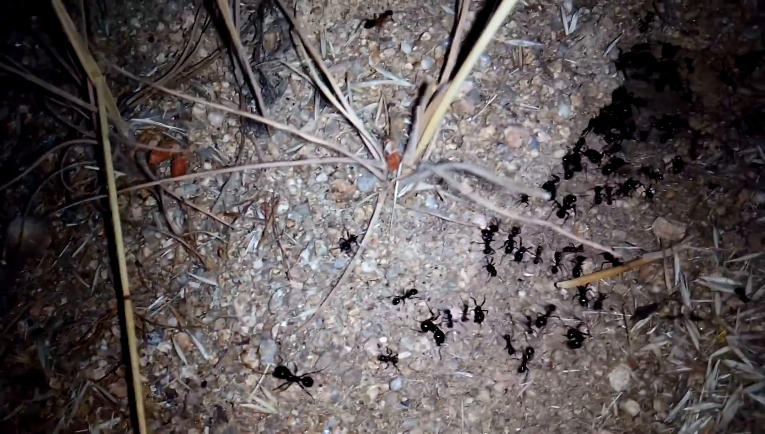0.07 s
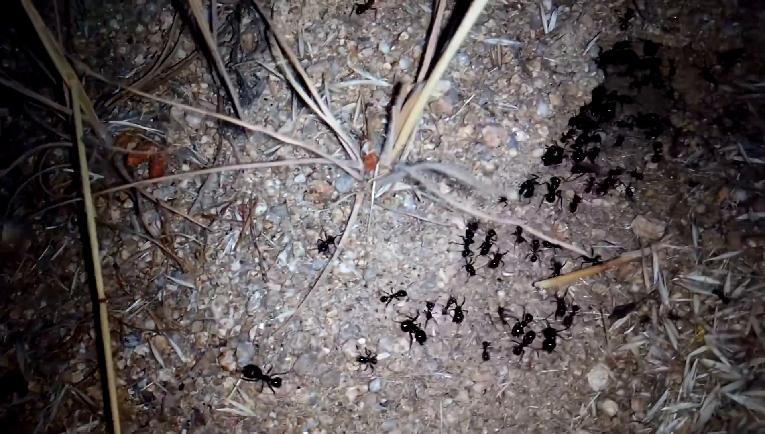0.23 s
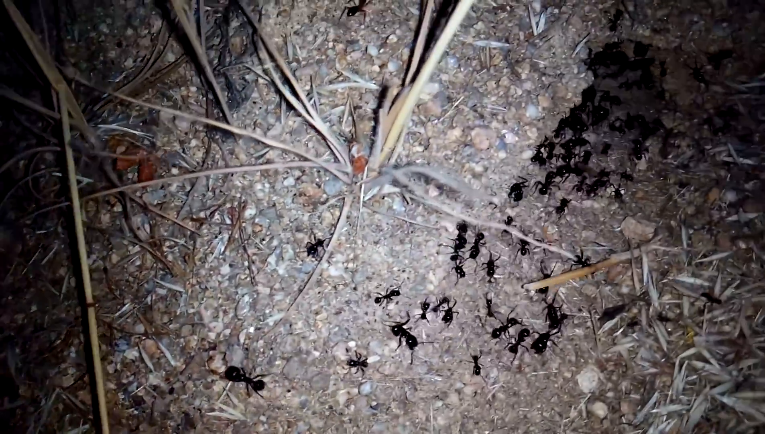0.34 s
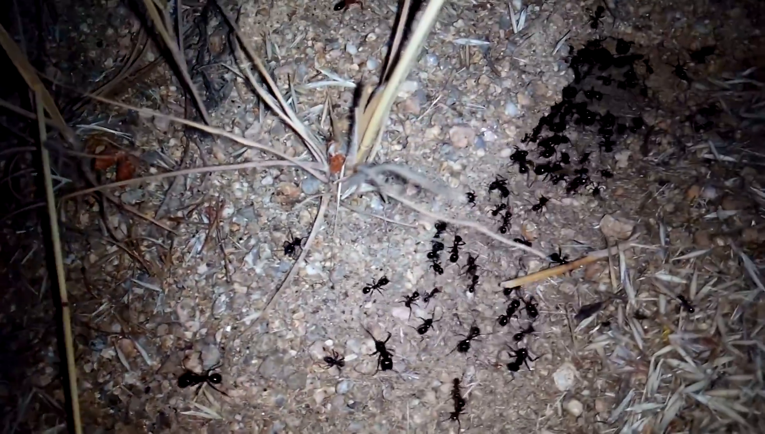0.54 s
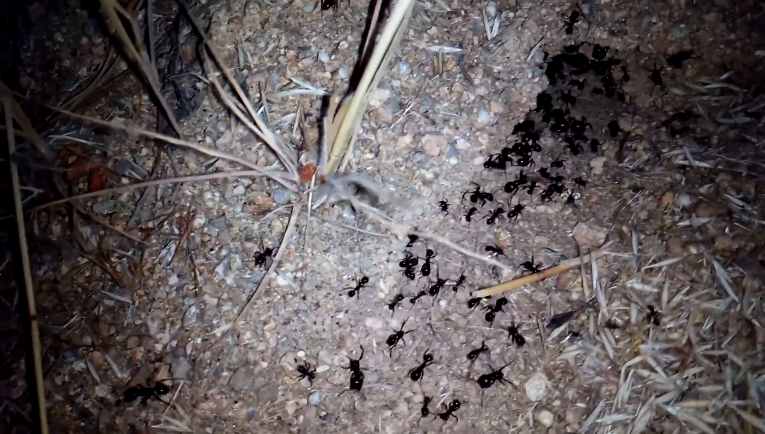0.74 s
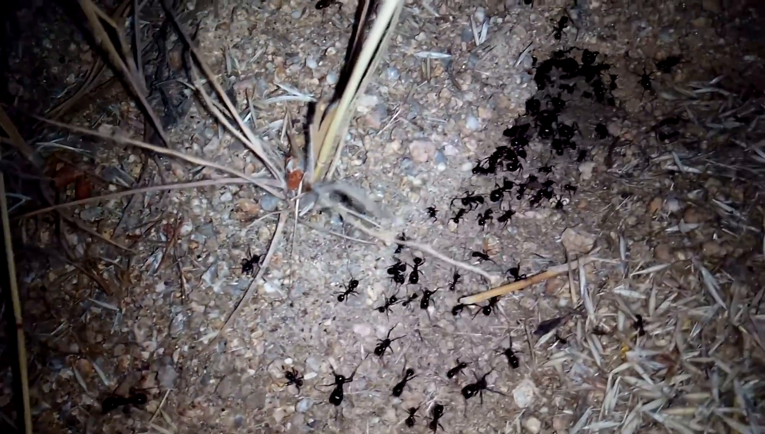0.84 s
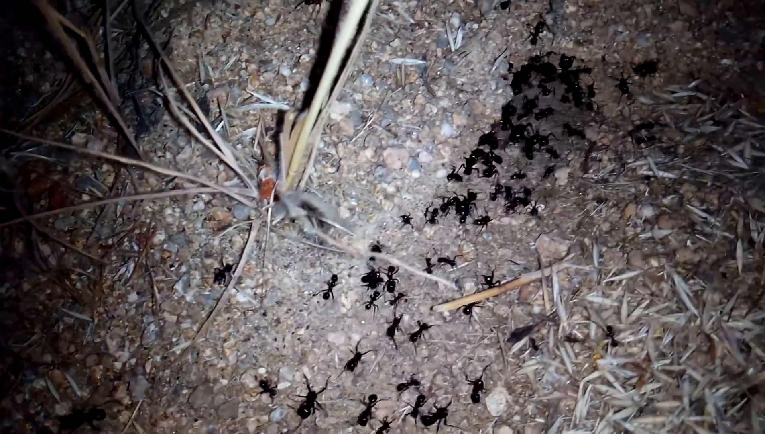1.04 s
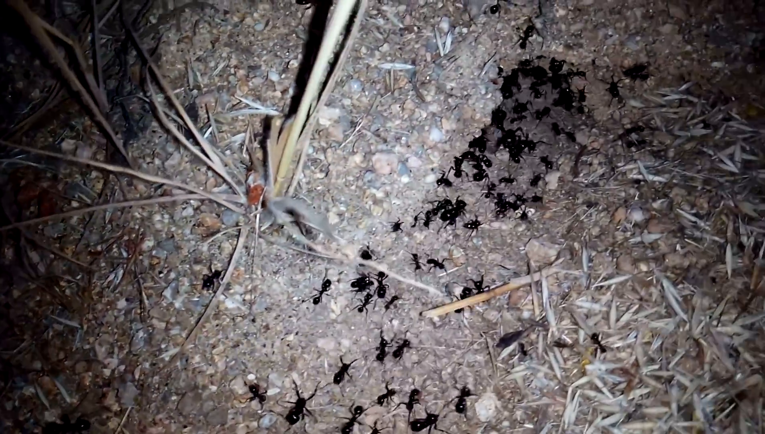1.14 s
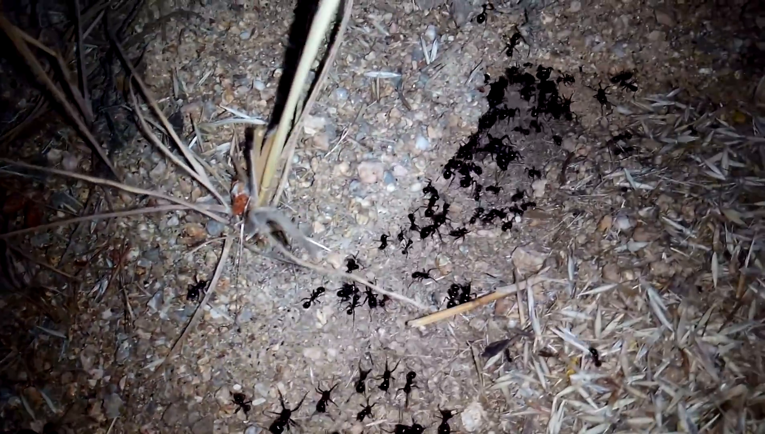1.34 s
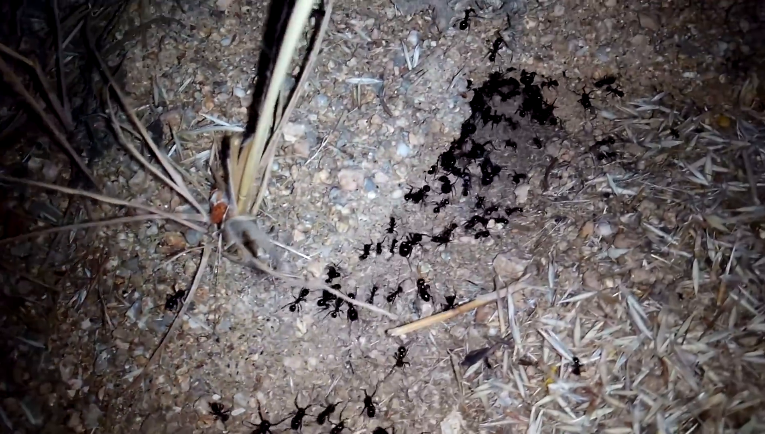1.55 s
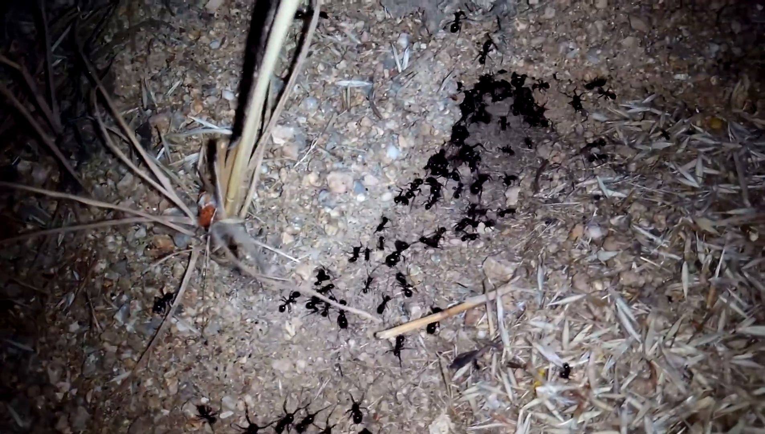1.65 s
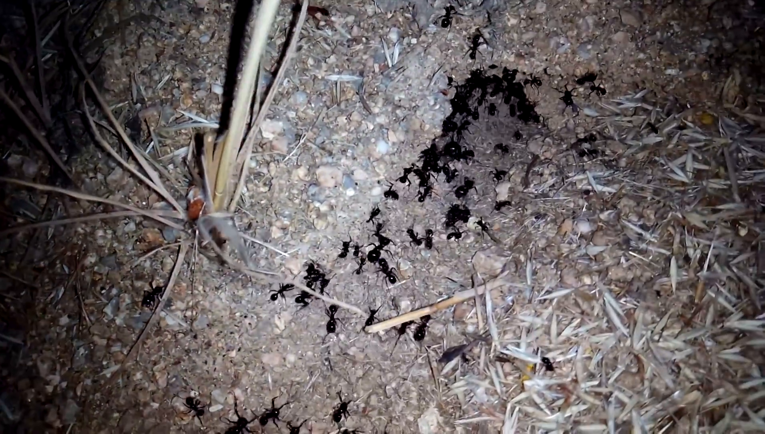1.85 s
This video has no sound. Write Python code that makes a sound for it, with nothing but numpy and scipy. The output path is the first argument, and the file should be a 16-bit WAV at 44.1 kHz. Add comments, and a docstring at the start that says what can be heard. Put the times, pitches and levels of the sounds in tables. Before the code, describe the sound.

Tiny dry clicks and crackles of ants crawling on straw, over a faint hum.

```python
"""Ants clamber over dry straw and sand, very close to the right microphone.
Each crackle is stick-slip friction: a quick run of impulses excites a bright chitter near 6 kHz
over the dull, damped ring of the stalks. Twice a stalk squeaks, and twice one bumps the ground.
Grit ticks faintly in between, over a low hum and the rumble and hiss of the open air."""
import sys
import numpy as np
from scipy import signal
from scipy.fft import rfft, irfft, next_fast_len
from scipy.io import wavfile
from scipy.ndimage import uniform_filter1d, minimum_filter1d

SR = 44100
rng = np.random.default_rng(int(sys.argv[2]) if len(sys.argv) > 2 else 0)


def to_wav(s):
    """Save 16-bit WAV."""
    ch = np.atleast_2d(s).T  # columns
    pcm = np.round(np.clip(ch, -1, 1) * 32767)  # PCM
    wavfile.write(sys.argv[1], SR, pcm.astype(np.int16))


N = 83790

# Spectral envelopes: f/Hz, relative level/dB
RUMBLE_SPECTRUM = [(20, -8.5), (45, 9), (90, 3), (150, -1), (240, -12), (450, -10.5), (750, -21),
                   (1100, -35.5), (3000, -36)]
HISS_SPECTRUM = [(100, -0.5), (400, 0.5), (750, 0.5), (1200, -9), (2500, -14), (4000, -11.5), (5300, -4),
                 (6300, -10), (7300, -18.5), (8500, -36), (15000, -30.5)]
GRIT_SPECTRUM = [(300, -24), (900, -12), (1400, -6.5), (2300, -5), (3600, -13.5), (4600, -8.5), (5400, -3),
                 (6400, 1.5), (7200, -13), (8200, -26), (15000, -32.5)]
CRACK_SPECTRUM = [(5000, -29.5), (7500, 1.5), (9000, 0), (13500, -0.5), (15300, -4), (16500, -29)]
CHITTER_SPECTRUM = [(4000, -28), (4700, 0), (5100, 2), (6800, 2), (7400, -3), (8300, -3)]
ECHO_SPECTRUM = [(500, 6.5), (2200, 12), (5200, -6.0), (7000, -2.5), (12000, 0.0)]
# Time envelopes: t/s, level/dB
RUMBLE_ENVELOPE = [(0, -72), (.8, -70), (1.3, -70.5), (1.9, -65.5)]
HISS_ENVELOPE = [(0, -70), (.5, -76), (1.2, -71), (1.9, -70.5)]
GRIT_ENVELOPE = [(0, -68.5), (.2, -69.5), (.5, -73.5), (.7, -65), (.95, -71), (1.15, -63.5), (1.3, -68),
                 (1.55, -65), (1.68, -67), (1.8, -60.5)]
# Hollow swells in the air: centre t/s, half length/s, f/Hz, level/dB
AIR_SWELLS = [(1.014, 0.028, 614, -70.5), (1.108, 0.023, 685, -69.5), (1.231, 0.014, 440, -67),
              (1.236, 0.016, 667, -65), (1.626, 0.024, 674, -77.5)]
# Course of the hum: t/s, fundamental f/Hz, level/dB midway between the channels
HUM_COURSE = [(0.0, 62.64, -71), (0.088, 60.64, -72.5), (0.21, 59.8, -62), (0.39, 58.82, -59.5),
              (0.508, 59.55, -69.5), (0.576, 60.14, -66.5), (1.65, 63.45, -60.5), (1.846, 62.63, -58.5),
              (1.9, 67, -76)]
# Soft rasping swells, two faint echoes of the loudest crackle and then a few weak crackles:
# centre t/s, half length/s, level/dB
RASP_SWELLS = [(0.307, 0.02, -57.5), (0.386, 0.0094, -64), (0.522, 0.0014, -62.5), (0.564, 0.0028, -55.5),
               (0.832, 0.0055, -56.5), (1.058, 0.0041, -57.5), (1.328, .002, -58), (1.798, .0015, -53)]
# Stalks striking the ground: t/s, f/Hz, level/dB
GROUND_IMPACTS = [(.1705, 270, -46), (1.8565, 255, -50)]
# Squeaking stalks: centre t/s, half length/s, centre f/Hz, level/dB
STALK_SQUEAKS = [(0.1883, 0.0039, 5196, -6), (1.5962, 0.00055, 4580, -37.5)]
# Modes of a ringing stalk: ratio to the stalk pitch, half width/Hz, relative level/dB
STALK_RESONANCES = [(.77, 175, 3.5), (0.98, 190, 7), (1.22, 230, 0)]
# Modes of the straw's knock and snap: f/Hz, half width/Hz, relative level/dB
KNOCK_RESONANCES = [(320, 68, -7.5), (626, 110, 2), (900, 132, -2)]
SNAP_RESONANCES = [(2940, 620, -1), (4640, 540, 3.5)]
# Runs of slips: t/s, length/s, chitter level/dB before weighting by length, chitter f/Hz, stalk f/Hz,
# then level/dB relative to the chitter of the knock, stalk ring, snap and crack
SLIP_RUNS = [(0.132, 0.0055, -58.5, 5900, 1680, -13, 5.5, -17, -37),
             (0.1697, 0.0018, -13, 6400, 1560, -22.5, -15.5, -13.5, -20.5),
             (0.1737, 0.00039, -6, 6250, 1530, -39, -20, -19.5, -20),
             (0.1754, 0.0086, -15.5, 6080, 1950, -36.5, -48, -19.5, -22),
             (0.183, 0.011, -15.5, 5920, 1820, -47, -29, -27, -24.5),
             (0.1943, 0.0072, -20.5, 5630, 1760, -47, -22, -16.5, -31),
             (0.2104, 0.0017, -25, 5490, 2020, -37, -18.5, -17.5, -29),
             (0.2144, 0.0046, -22, 5680, 2040, -53, -24.5, -27, -33.5),
             (0.2208, 0.0018, -29, 5940, 1580, -39, -12.5, -20.5, -26),
             (0.234, 0.00037, -23.5, 5590, 1650, -40, -17, -23.5, -32.5),
             (0.612, 0.0026, -17.5, 5790, 1750, -42, -22.5, -31, -27),
             (0.6155, 0.008, -22.5, 5840, 1870, -44.5, -20.5, -24.5, -25),
             (0.6282, 0.0015, -32.5, 6040, 1820, -26, -8.5, -25, -32),
             (0.657, 0.0085, -36.5, 5740, 1740, -30.5, -11, -31, -22.5),
             (0.6646, 0.002, -34, 5920, 1690, -26.5, -11.5, -22, -26),
             (0.6954, 0, -46, 6440, 1910, -17, -10.5, -20.5, -30),
             (0.764, 0.0029, -29.5, 6140, 1666, -39.5, -14, -41, -22),
             (0.7671, 0.0075, -33, 5750, 1834, -26.5, -12, -20.5, -24),
             (0.839, 0.0046, -38.5, 5950, 1800, -24.5, -5.5, -20.5, -16),
             (0.8434, 0.00013, -31, 6170, 1910, -30, -10, -39, -26),
             (0.8929, 0.0007, -37, 6200, 1720, -36.5, -10.5, -21.5, -24.5),
             (0.9115, 0.00039, -31.5, 6200, 1680, -48, -9.5, -28, -30),
             (1.0012, 0, -28.5, 6550, 1830, -35.5, -15, -32, -23.5),
             (1.0039, 0.0051, -37.5, 6320, 1816, -25, -5, -17.5, -18.5),
             (1.0862, 0.0051, -44.5, 5980, 2107, -19.5, -10, -26.5, -20.5),
             (1.0924, 0.0076, -34, 6400, 1860, -25, -10, -18.5, -23),
             (1.1042, 0.00028, -31, 6550, 2210, -26.5, -14.5, -23, -26),
             (1.1658, 0.008, -42.5, 6130, 1790, -16, -13, -10.5, -19.5),
             (1.1738, 0, -39, 5100, 2060, -23, -5.5, -14, -10),
             (1.183, 0.016, -53.5, 6000, 1960, -10, -8.5, -7, -10),
             (1.2202, 0.0022, -30.5, 6360, 1800, -26.5, -13, -16, -23),
             (1.2232, 0.0014, -33, 6000, 1760, -21.5, -6.5, -8, -16),
             (1.2259, 0.0062, -31, 6000, 1760, -25.5, -11, -17, -22),
             (1.3591, 0.00043, -29, 5710, 1970, -22.5, -10.5, -19, -27),
             (1.3623, 0, -36, 5840, 2030, -11, -9.5, -12, -19),
             (1.3662, 0.0075, -40, 5800, 2065, -23, -7.5, -11.5, -23),
             (1.3747, 0.0015, -47, 5920, 2090, -13.5, 0, -14, -22),
             (1.3772, 0.0076, -47.5, 5900, 1973, -14.5, -13.5, -15, -21.5),
             (1.4867, 0.0033, -39, 5860, 1895, -19.5, -14.5, -15, -35),
             (1.5078, 0.0013, -45, 5900, 1980, -15.5, -4, -13, -30),
             (1.5108, 0, -36, 6300, 2020, -25, -18, -24, -30),
             (1.5333, 0.0044, -42.5, 6350, 1880, -21, -8.5, -18, -31.5),
             (1.5624, 0, -36, 5890, 2340, -26, -14.5, -21.5, -35),
             (1.596, 0.0013, -39.5, 6500, 2430, -22, -14.5, -12, -21),
             (1.7252, 0.001, -28.5, 6580, 1650, -36, -14, -9.5, -26.5),
             (1.7278, 0.0023, -34.5, 5180, 1660, -23.5, -2.5, -6.5, -17.5),
             (1.7334, 0.0062, -38.5, 6260, 2170, -22, -10.5, -6, -19),
             (1.8567, 0, -46.5, 5700, 1700, 1.5, 6, 0, -30.5),
             (1.8643, 0.0025, -32.5, 6200, 1820, -23.5, -20, -6, -20.5),
             (1.8811, 0.0031, -47, 6350, 2500, -11, -4, -14, -21.5),
             (1.8987, 0.00053, -22, 6300, 1660, -26, -11, -14.5, -26.5)]

SIZE, LEAD = 4096, 256  # samples in one crackle, and ahead of its onset
SLIP_GAP_S, PRESSED_GAP_S, PRESSED_DB = .0022, .0012, -26  # runs above PRESSED_DB slip faster
SLIP_SCATTER, SLIP_SPREAD_DB, FIRST_SLIP_DB = .2, 2.5, 2  # timing scatter is a share of the gap
CHITTER_WIDTH_HZ, PITCH_SPREAD_HZ = 680, 260
LEFT_DB, LEFT_PITCH_RATIO, LEFT_WIDTH_HZ = -28, 0.83, 420  # far chitter: weak, lower and smeared
KNOCK_LEFT_DB, CRACK_TAIL_DB = -30, -16  # relative to the near knock and to the crack


def amp(db):
    """Amplitude ratio for a level in decibels."""
    return 10 ** (np.asarray(db) / 20)


def unit(x):
    """The signal normalised to rms 1."""
    return x / np.sqrt(np.mean(x ** 2) + 1e-30)


def colour(points):
    """Magnitude response, interpolated in decibels over log frequency."""
    f, db = np.transpose(points)
    return lambda hz: amp(np.interp(np.log(hz + 1), np.log(f), db))


def curves(rows):
    """Linear interpolation of each column after the time, one value per sample."""
    times, *columns = np.transpose(rows)
    return [np.interp(np.arange(N) / SR, times, column) for column in columns]


def bell(x, centre, width):
    """Gaussian window; its half width is one standard deviation."""
    return np.exp(-.5 * ((x - centre) / width) ** 2)


def filtered(x, response):
    """Linear filtering: the spectrum is multiplied by a frequency response."""
    size = next_fast_len(N + SR // 4)
    return irfft(rfft(x, size) * response(np.fft.rfftfreq(size, 1 / SR)), size)[..., :N]


def add(track, sound, onset_s):
    """Superposition of a short sound on a track, aligned by its onset."""
    part = track[max(round(onset_s * SR) - LEAD, 0):][:SIZE]
    part += sound[:len(part)]


def air(swell_width_hz=45):
    """Filtered noise: rumble and hollow swells are coherent at the two microphones, hiss is not."""
    t = np.arange(N) / SR
    swells = np.zeros(N)
    for centre, half, hz, db in AIR_SWELLS:
        band = unit(filtered(rng.standard_normal(N), lambda f: bell(f, hz, swell_width_hz)))
        swells += amp(db) * bell(t, centre, half) * band
    rumble = unit(filtered(rng.standard_normal(N), colour(RUMBLE_SPECTRUM)))
    hiss = unit(filtered(rng.standard_normal((2, N)), colour(HISS_SPECTRUM)))
    rumble_db, = curves(RUMBLE_ENVELOPE)
    hiss_db, = curves(HISS_ENVELOPE)
    return amp(rumble_db) * rumble + amp(hiss_db) * hiss + swells


def hum(octave_db=-19.5):
    """A low tone and its second harmonic, slowly modulated in amplitude and frequency."""
    hz, db = curves(HUM_COURSE)
    phase = 2 * np.pi * np.cumsum(hz) / SR
    tone = amp(db) * unit(np.sin(phase) + amp(octave_db) * np.sin(2 * phase))
    return tone * amp([[1], [-1]])


def grit(grains_per_s=1800, spread_db=2.9, t60=0.011, left_db=-18.5):
    """Shot noise: small feet shift sand grains, each a tiny rasp; a few soft swells add in energy."""
    t = np.arange(N) / SR
    sizes = amp(spread_db * np.minimum(rng.exponential(size=(2, N)), 6))
    grains = (rng.random((2, N)) < grains_per_s / SR) * sizes
    energy = signal.lfilter([1], [1, -amp(-60 / SR / t60) ** 2], grains ** 2)
    rasp = unit(filtered(np.sqrt(energy) * rng.standard_normal((2, N)), colour(GRIT_SPECTRUM)))
    level_db, = curves(GRIT_ENVELOPE)
    swells = sum(amp(db) * bell(t, centre, half) for centre, half, db in RASP_SWELLS)
    return np.hypot(amp(level_db), swells) * rasp * amp([[left_db], [0]])


def echo(direct, t60=0.067):
    """Diffuse scattering from the surroundings returns a weak tail, duller than the direct sound."""
    tail = rng.standard_normal((2, SR // 2)) * amp(-60 * np.arange(SR // 2) / SR / t60)
    scattered = signal.fftconvolve(direct[None], tail / np.linalg.norm(tail[0]), axes=1)[:, :N]
    return amp([[-46], [-24]]) * filtered(scattered, colour(ECHO_SPECTRUM))


def thuds(t60=.025):
    """Impact of a stalk on the ground excites a low, damped sinusoid."""
    bumps = np.zeros(N)
    for onset, hz, db in GROUND_IMPACTS:
        age = np.maximum(np.arange(N) / SR - onset, 0)
        bumps += amp(db - 60 * age / t60) * np.sin(2 * np.pi * hz * age)
    return bumps * amp([[KNOCK_LEFT_DB], [0]])


def squeaks(sag_hz_per_s=22000):
    """Periodic stick-slip: under strain the slips lock into a whistle that sags as the stalk gives."""
    t = np.arange(N) / SR
    whistle = np.zeros(N)
    for centre, half, hz, db in STALK_SQUEAKS:
        offset = t - centre
        phase = 2 * np.pi * (hz - sag_hz_per_s * offset / 2) * offset
        whistle += amp(db) * bell(t, centre, half) * np.sin(phase)
    return np.array([amp(LEFT_DB) * whistle, whistle])


def resonances(f, modes, scale=1):
    """Modal response of straw: heavy damping broadens the peaks, and every stalk differs a little."""
    detunes, offsets_db = rng.standard_normal((2, len(modes))) * [[.025], [1.5]]
    return sum(amp(db + offset_db) * bell(f, scale * centre * (1 + detune), width)
               for (centre, width, db), detune, offset_db in zip(modes, detunes, offsets_db))


def splinter(rough, t60):
    """Spectrum of an impulse and its decaying noise tail; rough squared is their energy ratio."""
    impulse = np.eye(1, SIZE)[0]
    tail = rng.standard_normal(SIZE) * amp(-60 * np.arange(SIZE) / SR / t60)
    return rfft(impulse + rough * tail / np.linalg.norm(tail))


def slip_run(f, length, gap, hz):
    """Stick-slip: spectra of an uneven impulse train and its chitter, each slip at its own pitch."""
    count = int(np.clip(round(length / gap) + 1, 1, 10))
    late, louder, higher = rng.standard_normal((3, 10, 1))[:, :count]
    place = np.linspace(0, 1, count)[:, None]
    delay = LEAD / SR + length * place + SLIP_SCATTER * gap * late * (place > 0)
    strength = amp(SLIP_SPREAD_DB * louder + FIRST_SLIP_DB * (place == 0))
    slips = strength * np.exp(-2j * np.pi * f * delay)
    pitch = hz + PITCH_SPREAD_HZ * (higher - higher.mean())
    chitter = (slips * bell(f, pitch, CHITTER_WIDTH_HZ)).sum(0) * colour(CHITTER_SPECTRUM)(f)
    return slips.sum(0), chitter


def crackles():
    """Impulsive excitation: slips drive the straw's chitter, ring, knock, snap and thin crack."""
    stereo = np.zeros((2, N))
    f = np.fft.rfftfreq(SIZE, 1 / SR)
    for onset, length, db, hz, stalk_hz, knock_db, stalk_db, snap_db, crack_db in SLIP_RUNS:
        gap = PRESSED_GAP_S if db > PRESSED_DB else SLIP_GAP_S
        force, chitter = slip_run(f, length, gap, hz)
        knock = force * resonances(f, KNOCK_RESONANCES)
        crack = force * colour(CRACK_SPECTRUM)(f)
        near = [
            (0, chitter * splinter(rough=0.62, t60=0.0074)),
            (stalk_db, force * resonances(f, STALK_RESONANCES, stalk_hz) * splinter(rough=.5, t60=.016)),
            (knock_db, knock * splinter(rough=0.14, t60=.025)),
            (snap_db, force * resonances(f, SNAP_RESONANCES) * splinter(rough=1.3, t60=.01)),
            (crack_db, crack * splinter(rough=2, t60=.008)),
            (crack_db + CRACK_TAIL_DB, crack * splinter(rough=10, t60=0.111))]  # faint, fading hiss
        far_response = bell(f, LEFT_PITCH_RATIO * hz, LEFT_WIDTH_HZ) + amp(-17.5) * bell(f, 1100, 1600)
        far = [(LEFT_DB, force * far_response * splinter(rough=22, t60=0.022)),
               (knock_db + KNOCK_LEFT_DB, knock * splinter(rough=1, t60=.03))]
        gain = amp(db) * np.sqrt((length + SLIP_GAP_S / 2) * SR / SIZE)  # energy grows with length
        for track, layers in zip(stereo, (far, near)):
            crackle = sum(amp(level) * unit(irfft(spectrum)) for level, spectrum in layers)
            add(track, gain * crackle, onset)
    return stereo


def scene():
    """Superposition of the close straw sounds, their echo, and the grit, hum and air."""
    straw = crackles() + squeaks() + thuds()
    return straw + echo(straw[1]) + grit() + hum() + air()


def record(dry, top_hz=16700, slope_hz=1200):
    """Peak limiting holds down anything above full scale; a low-pass filter bounds the bandwidth."""
    needed_gain = minimum_filter1d(1 / np.maximum(abs(dry), 1), size=9, axis=1)
    limited = dry * uniform_filter1d(needed_gain, size=9, axis=1)
    return filtered(limited, lambda hz: np.clip((top_hz - hz) / slope_hz, 0, 1))


dry = scene()
out = record(dry)
to_wav(out)
```